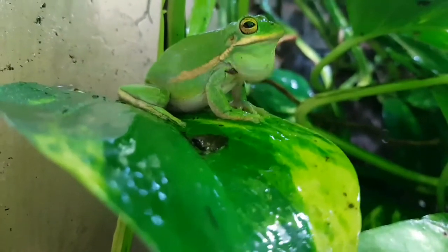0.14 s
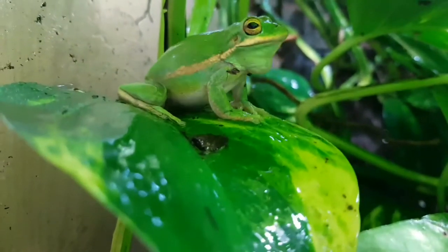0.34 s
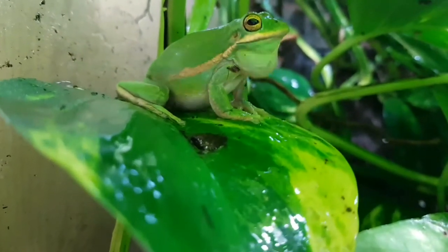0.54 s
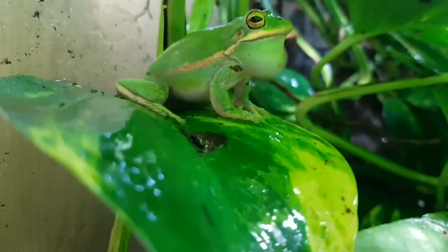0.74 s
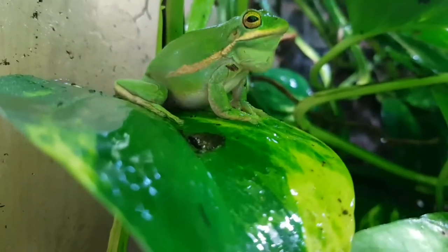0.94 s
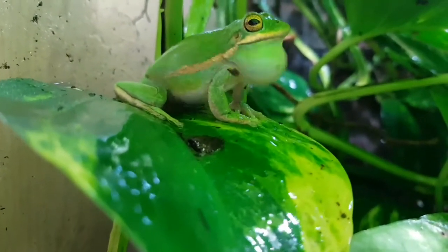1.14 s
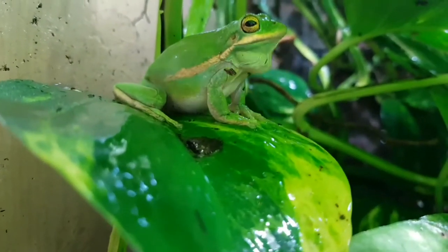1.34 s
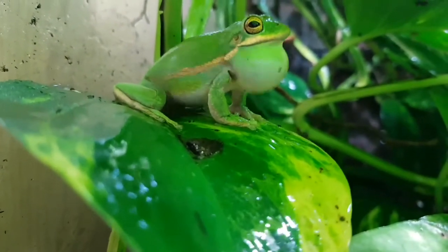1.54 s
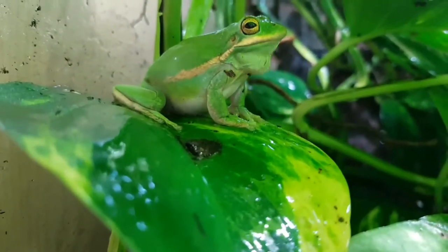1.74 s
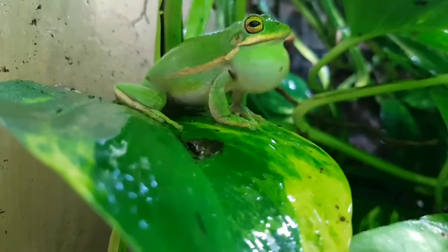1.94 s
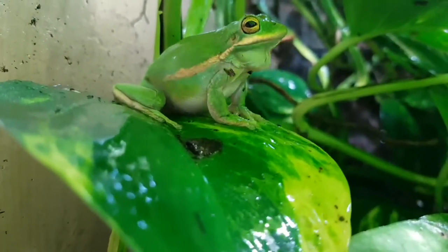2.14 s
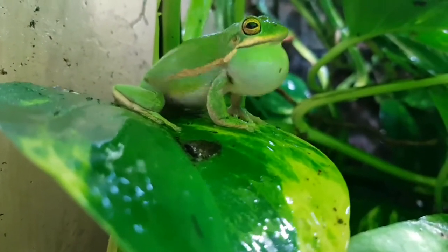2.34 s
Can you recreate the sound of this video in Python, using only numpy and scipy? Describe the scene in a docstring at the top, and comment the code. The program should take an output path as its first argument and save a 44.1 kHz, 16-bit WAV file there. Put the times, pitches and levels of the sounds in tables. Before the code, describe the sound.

Close to the microphone, a tree frog barks six times in steady succession. Each call starts rough, turns bright and ends raspy, followed by a short echo over the faint rumble and hiss of a quiet room.

```python
"""A quiet room, with a stereo microphone close to a green tree frog on a leaf. It barks six times.
Each bark follows a soft click of the throat: a rough low tone starts it, a bright upper tone
bursts in as the vocal sac fills, and it ends in a rasp. The sac and the leaves colour the voice.
The room rings on briefly behind it, over a faint rumble and hiss of air."""
import sys
import numpy as np
from scipy import signal
from scipy.fft import rfft, irfft
from scipy.io import wavfile
from scipy.ndimage import uniform_filter1d, minimum_filter1d

SR = 44100
rng = np.random.default_rng(int(sys.argv[2]) if len(sys.argv) > 2 else 0)


def to_wav(sig):
    """Store sig (one row per channel, or 1-D mono) as 16-bit WAV at the path in sys.argv[1].

    Samples outside -1..1 are clipped; the rate is SR.
    """
    pcm = np.clip(np.atleast_2d(sig), -1, 1) * 32767
    pcm = np.round(pcm).astype(np.int16)
    wavfile.write(sys.argv[1], SR, pcm.T)  # frames by channels


N = 105840

# The frog's barks. Each row: start in seconds, length in seconds, relative level in dB, start and end
# of the bright part in seconds into the bark, low tone in Hz, upper tone in Hz.
FROG_BARKS = [(0.1371, 0.072, 0, 0.013, .046, 1166, 1930), (0.5235, 0.072, 2.45, .014, .042, 1189, 1979),
              (.899, .079, 1.5, .012, 0.045, 1209, 2060), (1.283, .083, -1, .018, .055, 1158, 2030),
              (1.672, .089, 0, 0.016, .053, 1193, 2050), (2.071, 0.079, 0, 0.013, .050, 1211, 2060)]
# Throat clicks ahead of the barks. Each row: start in seconds, relative level in dB.
THROAT_CLICKS = [(.114, -53), (0.121, -55.5), (.502, -53.5), (.879, -55.5), (1.266, -59), (1.272, -49),
                 (1.651, -53), (2.049, -55.5)]
# Colour of a throat click. Each row: frequency in Hz, gain in dB.
THROAT_COLOUR = [(100, -34), (600, -13.5), (1000, 1.5), (1500, -4.5), (2000, -3.5), (3400, -13.5),
                 (4500, -30), (9000, -44)]
# Air and overtones of the rasp. Each row: frequency in Hz, gain in dB.
RASP_COLOUR = [(100, -54), (300, -35), (480, -14), (720, -2), (950, -2), (1400, -2.5), (2300, -3.5),
               (2700, -2.5), (3300, -8), (4400, -13.5), (4800, -18), (5150, -10.5), (5600, -16),
               (6200, -17.5), (6550, -43), (7500, -27.5), (8100, -53.5), (9000, -43.5), (11000, -51.5),
               (15000, -44.5)]
# The crisp edge of a bark's first puffs. Each row: frequency in Hz, gain in dB.
SNAP_COLOUR = [(100, -39), (700, -24.5), (1500, -5), (3400, 1.5), (4800, -15.5), (7300, -13), (9000, -24.5),
               (15000, -24)]
# A faint tick between the first two barks. Each row: frequency in Hz, gain in dB.
TICK_COLOUR = [(100, -19.5), (1000, -9), (3000, -3.5), (6000, -4), (9000, -11), (15000, -17.5)]
# Resonances and dips of the sac and the leaves around it. Each row: frequency in Hz, gain in dB.
SAC_AND_LEAVES = [(100, -13), (270, -10), (480, -0.5), (780, -3.5), (990, 4.5), (1200, -2.5), (1310, 1.5),
                  (1450, 1), (1540, -7.5), (1650, -11), (1810, 10), (1930, -1), (2150, 0.5), (2340, 0.5),
                  (2460, -13), (2630, 1.5), (2760, -5.5), (2950, 4.5), (3500, -2), (16000, -0.5)]
# Phase between the microphone's two ports. Each row: frequency in Hz, lead of the left in radians.
MIC_PHASE = [(100, 0), (500, 0.5), (800, 1.48), (1100, 1.12), (1350, 1.28), (1550, .5), (2000, 1.46),
             (2450, 0.85), (2900, 3), (3600, 4.5), (4300, 6.5), (5000, 11), (5800, 10.5)]
# Balance of the two ports. Each row: frequency in Hz, left minus right in dB.
MIC_BALANCE = [(60, -3.5), (99, -4.5), (160, 0.0), (270, -3.5), (450, -3.5), (740, -0.5), (1220, 0.0),
               (2010, -3), (3330, -10.5), (5500, -2.5), (9080, -3.5), (15000, -2.5)]
# The room's tail. Each row: frequency in Hz, time to fall 60 dB in seconds.
ROOM_DECAY = [(200, .3), (600, 0.49), (1100, 0.4675), (2300, .5), (5000, 0.37), (12000, 0.16)]
# Colour of the room's echoes. Each row: frequency in Hz, gain in dB.
ECHO_COLOUR = [(200, -10.5), (700, -0.5), (950, 1.5), (1100, -0.5), (1250, -4.5), (1600, -1), (2000, -5),
               (2350, -4), (3000, -2), (4000, -5.5), (6000, -0.5), (12000, -4.5)]
# Air of the quiet room. Each row: frequency in Hz, relative spectral density in dB.
AIR_COLOUR = [(20, -8.5), (60, -4.5), (90, -6), (115, -0.5), (145, -5.5), (190, -4), (260, -12),
              (400, -10.5), (700, -14), (1500, -20), (3000, -27), (6000, -28), (10000, -33), (14000, -31)]

ATTACK_S, RELEASE_S, SWELL_S, SAG_S = 0.00046, 0.0046, 0.0025, .006
FLUTTER_HZ, FLUTTER_JITTER = 342.85, .15
# START, AFTER and END add to a layer's level: before the sac fills, after the bright part, by the end.
# A GLIDE is a fraction of the tone's pitch.
LOW_DB, LOW_START_DB, LOW_END_DB, LOW_GLIDE = -13.5, -4.5, -12.5, -.15
HIGH_DB, HIGH_START_DB, HIGH_AFTER_DB, HIGH_END_DB, HIGH_GLIDE = -11.5, -24, -9, -5.5, 0.1206
OVERTONE_DB, OVERTONE_HZ, OVERTONE_GLIDE = -36.5, 3727, 0.25
TONE_LOW_CUT_HZ = 766
RASP_DB, RASP_START_DB, RASP_END_DB = -21, -15, -7.5
LAST_PUFF_DB, LAST_PUFF_LEAD_S, LAST_PUFF_WIDTH_S = 8.5, .007, 0.00071


def bark(length, level_db, bright_from, bright_until, low_hz, high_hz, count=8192):
    """The upper tones burst in and climb as the sac fills, then the low tone sinks under a rasp."""
    t = np.arange(count) / SR
    unfilled = .5 - .5 * np.tanh((t - bright_from) / SWELL_S)
    spent = .5 + .5 * np.tanh((t - bright_until) / SAG_S)
    fade = np.clip((t - bright_until) / (length - bright_until), 0, 1)
    climb = np.clip((t - bright_from) / (bright_until - bright_from), 0, 1) - .5
    last_puff = np.exp(-((t - length + LAST_PUFF_LEAD_S) / LAST_PUFF_WIDTH_S) ** 2)
    gate = np.minimum(t / ATTACK_S, 1) * np.exp(-np.maximum(t - length, 0) / RELEASE_S)
    flutter_hz = FLUTTER_HZ * (1 + FLUTTER_JITTER * wander(count, rate_hz=244))
    flutter = 2 * np.pi * np.cumsum(flutter_hz) / SR

    low_pitch = low_hz * (1 + LOW_GLIDE * spent)
    high_pitch = high_hz * (1 + HIGH_GLIDE * climb)
    overtone_pitch = OVERTONE_HZ * (1 + OVERTONE_GLIDE * climb)
    low = membrane(low_pitch, flutter, jitter=.09, jitter_hz=166, chop=.3, bend=.41, shimmer=.07)
    high = membrane(high_pitch, flutter, jitter=.05, jitter_hz=158, chop=.11, bend=.74, shimmer=.18)
    overtone = membrane(overtone_pitch, flutter, jitter=.04, jitter_hz=168, chop=.3, bend=.68, shimmer=.2)

    tones = low * amp(LOW_DB + LOW_START_DB * unfilled + LOW_END_DB * fade)
    tones += high * amp(HIGH_DB + HIGH_START_DB * unfilled + HIGH_AFTER_DB * spent + HIGH_END_DB * fade)
    tones += overtone * amp(OVERTONE_DB) * (1 - spent)
    low_cut = signal.butter(6, TONE_LOW_CUT_HZ, "high", fs=SR, output="sos")
    voice = signal.sosfilt(low_cut, tones * gate)
    rasp_db = RASP_DB + RASP_START_DB * unfilled + RASP_END_DB * fade + LAST_PUFF_DB * last_puff
    voice += gate * rasp(low_pitch, flutter) * amp(rasp_db)
    voice *= amp(level_db)
    return voice + ring(voice)


def membrane(hz, flutter, jitter, jitter_hz, chop, bend, shimmer, harmonics=1):
    """A membrane vibrates unsteadily; the flutter chops its level and bends its phase."""
    unsteady_hz = hz * (1 + jitter * wander(len(hz), jitter_hz))
    phase = 2 * np.pi * np.cumsum(unsteady_hz) / SR + bend * np.sin(flutter)
    swing = (1 + chop * np.cos(flutter)) * (1 + shimmer * wander(len(hz), jitter_hz))
    return unit(swing * sum(np.cos(k * phase) for k in range(1, harmonics + 1)))


def rasp(hz, flutter, voiced=.45):
    """Uneven pulses of the voice mix with puffs of air, both chopped by the flutter."""
    pulses = membrane(hz, flutter, jitter=.0692, jitter_hz=393, chop=.58, bend=.4, shimmer=.55,
                      harmonics=13)
    puffs = unit(rng.standard_normal(len(hz)) * np.exp(.39 * np.cos(flutter)))
    return unit(colour(voiced * pulses + (1 - voiced) * puffs, RASP_COLOUR))


def ring(voice, hz=977.4, t60_s=.029, gain_db=-9):
    """A low resonance, driven by the voice, that outlasts the bark."""
    t = np.arange(len(voice)) / SR
    fall = amp(-60 * t / t60_s)
    response = 2 * fall * np.cos(2 * np.pi * hz * t) / fall.sum()  # gain 1 at its centre
    return amp(gain_db) * signal.fftconvolve(voice, response)[:len(voice)]


def click(level_db, shape, decay_s, count=2048):
    """A burst of coloured noise that dies at once: a throat click, a snap or a tick."""
    t = np.arange(count) / SR
    burst = rng.standard_normal(count) * np.exp(-t / decay_s)
    return amp(level_db) * unit(colour(burst, shape))


def microphone_ports(close):
    """The close sound reaches the two microphone ports with different phase and level."""
    hz = np.fft.rfftfreq(N, 1 / SR)
    left = amp(read(MIC_BALANCE, hz) / 2) * np.exp(.5j * read(MIC_PHASE, hz))
    return irfft(rfft(close) * np.array([left, 1 / left]), N)


def room(x, tail_db=-20.5, early_db=-15, early_decay_s=.0043):
    """Quick echoes off leaves and wall, then a diffuse tail, on one side of the microphone."""
    t = np.arange(SR) / SR
    hz, frame_s, spectra = signal.stft(rng.standard_normal(SR), SR, nperseg=256)
    fall = amp(-60 * frame_s / read(ROOM_DECAY, hz)[:, None])
    tail = signal.istft(spectra * fall, SR, nperseg=256)[1][:SR] * (t > .006)
    early = rng.standard_normal(SR) * np.exp(-t / early_decay_s) * (t > .002)
    response = amp(tail_db) * tail / np.linalg.norm(tail) + amp(early_db) * early / np.linalg.norm(early)
    return colour(signal.fftconvolve(x, response)[:len(x)], ECHO_COLOUR)


def dying_echo(ago_s=.27):
    """As the scene opens, the room still rings from a bark that began a moment ago."""
    voice = np.zeros(N)
    add(voice, 0, bark(*FROG_BARKS[1][1:]))
    tails = [room(voice)[round(ago_s * SR):] for _ in range(2)]
    return np.array([np.pad(tail, (0, N - len(tail))) for tail in tails])


def room_air(level_db=-66.5, shared_power=.75):
    """Room tone: faint rumble and hiss, mostly shared by both sides of the microphone."""
    shared, *sides = (unit(colour(noise, AIR_COLOUR)) for noise in rng.standard_normal((3, N)))
    return amp(level_db) * (np.sqrt(shared_power) * shared + np.sqrt(1 - shared_power) * np.array(sides))


def amp(db):
    """Decibels to gain."""
    return 10 ** (np.asarray(db) / 20)


def unit(x):
    """Scales to rms 1."""
    return x / np.sqrt(np.mean(x ** 2) + 1e-20)


def read(points, hz):
    """Reads a table on a log-frequency axis."""
    table_hz, value = np.transpose(points)
    return np.interp(np.log(hz + 1), np.log(table_hz + 1), value)


def add(mix, start_s, sound):
    """Mixes a sound in at a time."""
    part = mix[round(start_s * SR):][:len(sound)]
    part += sound[:len(part)]


def colour(x, points, size=4096):
    """Minimum-phase filter shaped by a table of frequency in Hz and gain in dB."""
    log_gain = np.log(amp(read(points, abs(np.fft.fftfreq(size, 1 / SR)))))
    taps = np.fft.ifft(np.exp(signal.hilbert(log_gain).conj())).real[:size // 2]
    return signal.fftconvolve(x, taps)[:len(x)]


def wander(count, rate_hz):
    """Smooth random drift of rms 1, rolling off above the rate."""
    hz = np.fft.rfftfreq(count, 1 / SR)
    smoothing = np.exp(-(hz / rate_hz) ** 2) * (hz > 0)
    return unit(irfft(rfft(rng.standard_normal(count)) * smoothing, count))


def scene():
    """The frog close to the microphone, the room's echoes behind it, room tone underneath."""
    frog = np.zeros(N)
    for start, *shape in FROG_BARKS:
        add(frog, start, bark(*shape))
        add(frog, start, click(level_db=-49, shape=SNAP_COLOUR, decay_s=.0069))
    for start, level_db in THROAT_CLICKS:
        add(frog, start, click(level_db, THROAT_COLOUR, decay_s=.003))
    add(frog, start_s=.437, sound=click(level_db=-71.5, shape=TICK_COLOUR, decay_s=.008))
    direct = microphone_ports(colour(frog, SAC_AND_LEAVES))
    echoes = np.array([room(frog), room(frog)])
    return direct + echoes + dying_echo() + room_air()


def record(dry):
    """Behind the microphone, a quick limiter holds down any high peaks and a low-pass trims the top."""
    ceiling, smoothing_s, top_hz = .94, .003, 16000
    window = round(smoothing_s * SR) | 1
    allowed_gain = np.minimum(1, ceiling / (abs(dry).max(0) + 1e-9))
    gain = minimum_filter1d(allowed_gain, 3 * window)
    for _ in range(3):
        gain = uniform_filter1d(gain, window)
    low_pass = signal.firwin(511, top_hz, window=("kaiser", 9), fs=SR)
    return signal.oaconvolve(dry * gain, low_pass[None], "same")


dry = scene()
out = record(dry)
to_wav(out)
```